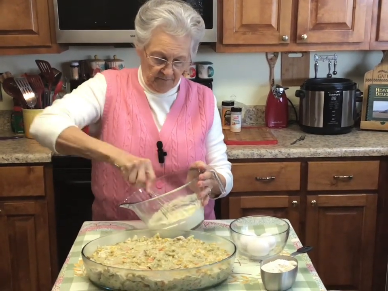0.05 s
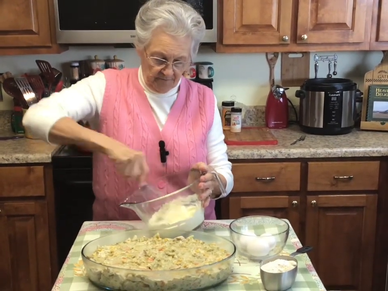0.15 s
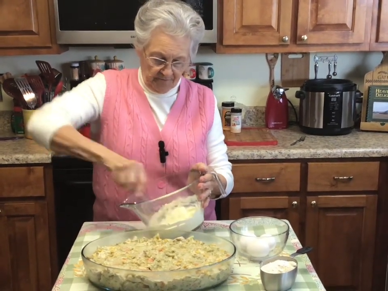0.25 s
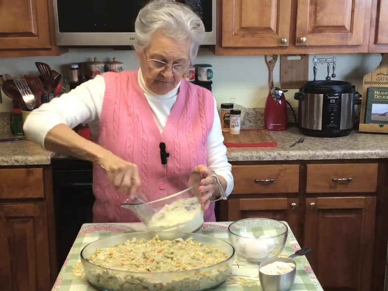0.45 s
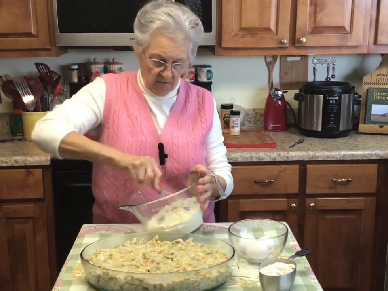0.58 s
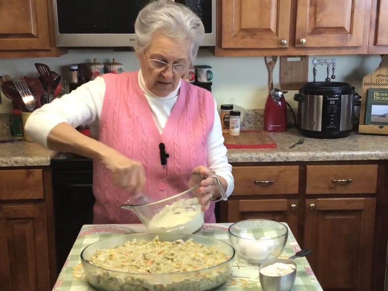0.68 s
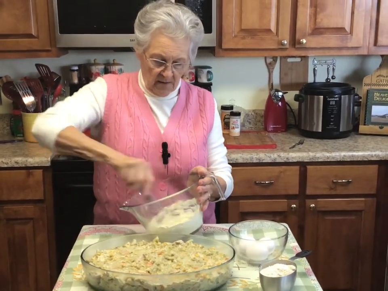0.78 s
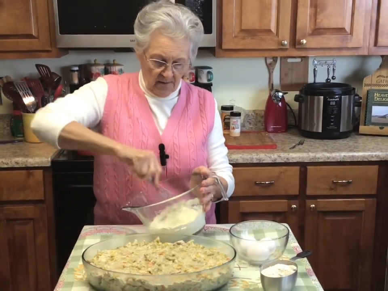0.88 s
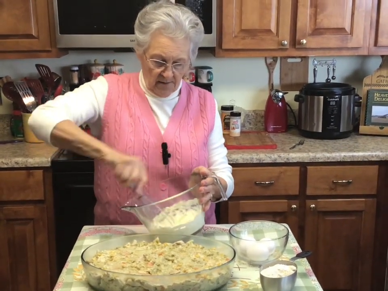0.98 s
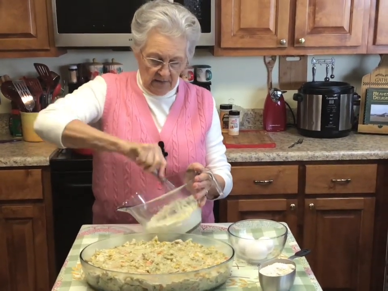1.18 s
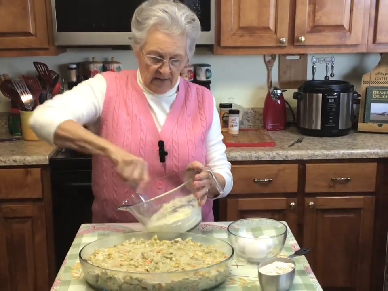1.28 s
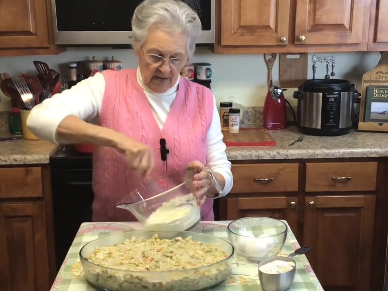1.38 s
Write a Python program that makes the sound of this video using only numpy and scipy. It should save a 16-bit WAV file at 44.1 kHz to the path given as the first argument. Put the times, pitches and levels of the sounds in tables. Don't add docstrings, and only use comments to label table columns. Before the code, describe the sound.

A wire whisk clatters against a glass bowl in quick, uneven strokes through soft cheese

```python
import sys
import numpy as np
from scipy import signal
from scipy.fft import rfft, irfft
from scipy.io import wavfile
from scipy.ndimage import uniform_filter1d

SR = 44100
rng = np.random.default_rng(int(sys.argv[2]) if len(sys.argv) > 2 else 0)


def undo_db(level):
    steps = np.asarray(level, float) / 20
    return 10 ** steps


def generate_wav(signal):
    frames = np.transpose(np.atleast_2d(signal))
    scaled = np.clip(frames, -1, 1) * 32767
    pcm = np.round(scaled).astype(np.int16)
    wavfile.write(sys.argv[1], SR, pcm)


N = 63945

# start_s, level_db, spread_ms, tilt_db_per_octave, loudest_hz
FIRM_BLOWS = [(0.0291, -36, 1.57, 2.5, 13700), (0.153, -30.5, 1.28, 2, 4272), (0.218, -16.5, 2.6, 3, 14210),
              (0.3129, -22.5, 2.86, 2, 5860), (0.433, -16, 3.6, 0.5, 3280), (0.4407, -15.5, 2.1, 4, 12430),
              (0.5623, -18.5, 3.76, 5, 3950), (0.6832, -20.5, 3.8, 2.5, 3640),
              (0.7107, -27, 3.9, -3, 15300), (.7215, -38, 0.83, 1, 1536), (0.73, -28.5, 0.67, 0, 4100),
              (0.8259, -22, 3.76, -1, 3964), (0.9847, -17, 1.26, 2.5, 9410), (1.0926, -7, 2.3, 2, 14200),
              (1.1673, -25, 1.46, 2, 3936), (1.212, -22, 1.34, -2.5, 5060), (1.225, -24, 1.45, 3.5, 5900),
              (1.29, -32, 3.6, 5, 8700), (1.298, -36, 2.55, -1, 5300), (1.327, -24, 2, 3, 4150),
              (1.3349, -28, 1.5, -13, 2920), (1.3511, -24, 0.5, -3.5, 4340),
              (1.395, -32.5, 0.12, -10.1, 4180), (1.41, -27.5, 1.23, -2, 3190)]
# start_s, level_db, spread_ms, loudest_hz
LIGHT_TOUCHES = [(.0003, -36.5, 1.5, 5370), (0.042, -40.5, 2.5, 6300), (0.077, -43, 1.3, 4870),
                 (.1025, -79, 0.51, 4240), (0.1162, -46.5, 0.82, 4600), (0.136, -59, 0.39, 4170),
                 (0.1448, -46, 0.67, 3150), (0.213, -42, 2.1, 7260), (0.377, -39.5, 2.3, 4240),
                 (0.4272, -31, 3.1, 6100), (0.467, -54, 4.9, 13000), (0.533, -35, 2.33, 3500),
                 (0.6253, -39, 2.96, 3140), (0.642, -44, 0.82, 4160), (0.784, -37, 3.5, 6540),
                 (0.8205, -28.5, 2.4, 4130), (.8892, -34.5, 1.57, 12400), (0.9324, -45, 0.71, 4860),
                 (0.976, -38, 2, 12600), (0.9805, -32.5, 2, 9600), (1.0878, -27.5, 2.78, 9350),
                 (1.309, -34, 1.1, 5400), (1.317, -31, 2.96, 2570), (1.3372, -43, 1.6, 13200),
                 (1.341, -33, 0.93, 3110), (1.388, -40, 1.46, 5200), (1.399, -45, 0.71, 2320),
                 (1.4448, -37, 0.52, 3720)]
# start_s, lowest_tone_db, second_tone_db, third_tone_db, fourth_tone_db
BOWL_RINGS = [(0.001, -67, -65, -47, -52), (0.027, -68, -98, -43, -53), (0.119, -96, -98, -77.5, -73),
              (0.153, -56, -90, -59, -69.5), (0.221, -30.5, -54, -41, -47.5),
              (0.317, -38, -58, -46.5, -80.5), (0.437, -43, -48.5, -58, -42.5),
              (0.567, -36.5, -51, -40.5, -44), (0.687, -44.5, -73, -50.5, -49),
              (0.827, -43.5, -55, -41.5, -62), (0.986, -47.5, -79, -76, -44.5),
              (1.093, -31.5, -28.5, -19, -23.5), (1.169, -41, -49, -42.5, -44.5),
              (1.213, -37, -44.5, -27.5, -37), (1.293, -43, -61, -46.5, -45.5),
              (1.350, -52.5, -56, -57, -49.5), (1.394, -54, -70, -49.5, -65)]
# start_s, level_db, pitch_hz, fade_s (time to drop 60 dB)
DULL_KNOCKS = [(0.434, -29.5, 556.5, 0.02414), (0.565, -35.5, 700, 0.048), (0.686, -29.5, 918, 0.022),
               (0.698, -35, 760, 0.028), (0.721, -29.5, 1470, 0.019), (0.611, -36.5, 1467, 0.018),
               (0.951, -39.5, 1360, 0.019), (1.169, -34, 536, 0.038), (1.168, -40.5, 139, 0.055),
               (1.201, -47.5, 25.6, 0.243), (1.213, -55, 122.9, 0.064), (1.332, -44, 2190, 0.02),
               (1.41, -57.5, 76, 0.16)]
# pitch_hz, fade_s, build_up_s
BOWL_TONES = [(619, .24, .007), (1012, .28, .003), (1411, .2, .004), (1535, .12, .002)]
# pitch_hz, level_db, fade_s
HIGH_TONES = [(2288, -10, .05), (2476, -10, .07), (3720, -7, .06), (3810, -7, .05), (4420, -4, .07),
              (5081, -2, .06), (5293, -7, .06), (5518, -6, .06), (5842, -6, .07), (7000, -6, .035),
              (9400, -9, .03), (11300, -11, .03), (13600, -7, .03), (14680, -9, .03)]
# pitch_hz, level_db (per Hz)
CRACK_COLOUR = [(120, -44), (200, -2.5), (1290, 5), (3250, 5), (5160, 3.5), (7060, 4), (7740, -2.5),
                (14000, 6.5), (16500, -13)]
# pitch_hz, fade_s
ECHO_FADE = [(300, 0.45), (790, 0.36), (2090, 0.14), (5510, 0.17), (14600, 0.14)]
# pitch_hz, level_db (per Hz)
HISS_COLOUR = [(25, -15), (300, -11.5), (600, -11), (1500, -20), (2300, -17.5), (5500, -19), (8000, -22.5),
               (16500, -34)]
# time_s, level_db
CLOTH_LEVEL = [(0, -75.5), (.15, -88), (.3, -78), (0.449, -55), (.6, -80), (.8, -79), (1.05, -81),
               (1.17, -73), (1.23, -58), (1.32, -89), (1.45, -78)]
# start_s, level_db, pitch_hz, fade_s
WIRE_TICKS = [(.0303, -38, 2400, 0.0044), (.0303, -43.5, 9300, 0.0078), (.0445, -45, 3400, 0.01),
              (.1026, -52, 4240, 0.0082), (0.119, -60, 1480, 0.04), (.138, -45, 4200, 0.0072),
              (0.1562, -45, 4300, 0.037), (0.1547, -51.5, 6900, 0.13), (0.2146, -49, 6930, 0.01),
              (.2205, -32.5, 3500, 0.021), (.2205, -37, 4800, 0.027), (.2205, -36.5, 6450, 0.025),
              (.222, -44, 2480, 0.094), (.222, -35.5, 5060, 0.028), (0.224, -37.5, 5830, 0.028),
              (.3148, -47, 3731, 0.089), (.348, -44, 900, 0.013), (.4428, -39, 12300, .008),
              (.443, -28, 3790, 0.0072), (0.567, -37.5, 4414, 0.0385), (0.566, -32.5, 6100, 0.015),
              (.627, -46.5, 2500, .006), (.641, -47, 4200, 0.017), (0.687, -30.5, 3900, 0.013),
              (0.7294, -37, 4240, .012), (.7795, -44, 6500, 0.014), (0.7842, -50.5, 4200, .012),
              (.8278, -32, 3300, 0.021), (0.8258, -37, 4425, 0.062), (.9335, -49, 5200, 0.0092),
              (0.973, -41, 1400, 0.02), (0.988, -34.5, 5400, .035), (1.0957, -15, 4400, .004),
              (1.0952, -24, 7000, .02), (1.097, -26, 5076, .05), (1.1698, -32, 4100, 0.0069),
              (1.1691, -36.5, 6700, 0.013), (1.2134, -29, 1400, 0.06), (1.2114, -54, 5200, .02),
              (1.228, -49, 5840, 0.059), (1.2915, -39.5, 3030, .012), (1.298, -44, 5380, 0.0363),
              (1.329, -50, 4285, 0.011), (1.3333, -35, 2400, .003), (1.3427, -35, 3000, .003),
              (1.4012, -39, 1500, .005), (1.4117, -31, 3500, .0025), (1.351, -45, 2200, 0.004),
              (1.353, -47, 4400, 0.037), (1.395, -34, 4285, .012)]

HISS_DB = -70
CLOTH_HZ, CLOTH_SWELL_DB = 60, 2.5
KNOCK_ECHO_DB, TICK_ECHO_DB, WALL_S = -11.5, -9.5, 0.0059
CRACK_FADE_S, WIRE_SPREAD_DB, CLATTER_DB, CLATTER_LOW_HZ = 0.026, 0.5, -11, 486
BAND_DB, BAND_HZ = 3, 110
HUMP_DB = 3
HIGH_TONES_DB, SPOT_DB = -25, 3.5
PING_DB, PING_FADE_S = -18.5, 0.022
BLOW_FOCUS_DB, TOUCH_FOCUS_DB, FOCUS_OCTAVES = 4, 6, 0.17
BLOW_WASH_DB, TOUCH_WASH_DB = -3, -0.5
TOUCH_TILT_DB = -1
DAMP_S, STOP_S = 0.075, 0.006
WAVER_HZ, WAVER_TURN = 22, 0.4
FLUTTER_DB = 4
TICK_RISE_TURNS, KNOCK_RISE_TURNS = 0.63, 0.53
GATE_DB, GATE_SLOPE, GATE_S = -45.5, 0.36, 0.025
EDGE_HZ = 16350


def read(points, hz):
    f, value = np.transpose(points)
    return np.interp(np.log(hz + 1), np.log(f + 1), value)


def add(mix, start_s, sound):
    part = mix[max(round(start_s * SR), 0):][:len(sound)]
    part += sound[:len(part)]


def colour(x, db):
    return irfft(rfft(x) * undo_db(db(np.fft.rfftfreq(len(x), 1 / SR))), len(x))


def smooth_noise(count, size):
    x = uniform_filter1d(uniform_filter1d(rng.standard_normal(count), size=size), size=size)
    return x / x.std()


def hiss():
    x = colour(rng.standard_normal(N), lambda f: read(HISS_COLOUR, f))
    return undo_db(HISS_DB) * x / x.std()


def cloth():
    x = colour(rng.standard_normal(N), lambda f: -20 * np.log10(1 + (f / CLOTH_HZ) ** 2))
    level_db = np.interp(np.arange(N) / SR, *np.transpose(CLOTH_LEVEL))
    return undo_db(level_db + CLOTH_SWELL_DB * smooth_noise(N, 1500)) * x / x.std()


def echoes(size):
    hz, t, z = signal.stft(rng.standard_normal(size), SR, nperseg=128)
    fading = z * undo_db(-60 * t / read(ECHO_FADE, hz)[:, None])
    tail = signal.istft(fading, SR, nperseg=128)[1][:size]
    tail = tail * (1 - np.exp(-(np.arange(size) / SR / WALL_S) ** 2))
    return tail / np.linalg.norm(tail)


def kitchen(x):
    return signal.fftconvolve(x, echoes(SR // 2))[:N]


def cracks(t, spread_ms, count=24):
    late = 3 * (np.arange(count) + rng.random(count)) / count
    strength = np.minimum(late / 1.83, 1) * np.exp(-1.1 * late)
    strength = strength * undo_db(WIRE_SPREAD_DB * rng.standard_normal(count))
    landings = np.bincount((spread_ms * SR / 1000 * late).astype(int), strength)
    power = signal.fftconvolve(landings ** 2, undo_db(-120 * t / CRACK_FADE_S))[:len(t)]
    noise = np.sqrt(abs(power)) * rng.standard_normal(len(t))
    return noise / np.linalg.norm(noise)


def high_ring(t, spread_ms, focus_hz):
    hz, db, fade_s = np.transpose(HIGH_TONES)[:, :, None]
    spot = rng.standard_normal((len(HIGH_TONES), 1))
    phase = rng.random((len(HIGH_TONES), 1))
    tones = undo_db(db + SPOT_DB * spot - 60 * t / fade_s) * np.sin(2 * np.pi * (hz * t + phase))
    ping = undo_db(PING_DB - HIGH_TONES_DB - 60 * t / PING_FADE_S) * np.sin(2 * np.pi * focus_hz * t)
    return (tones.sum(0) + ping) * (1 - np.exp(-t * 1000 / spread_ms))


def clatter(level_db, spread_ms, tilt_db, focus_hz, focus_db, wash_db):
    t = np.arange(8192) / SR
    humps = rng.standard_normal(12)

    def crack_db(f):
        near = sum(np.exp(-((f - hz) / (BAND_HZ * (1 + hz / 6000))) ** 2) for hz, *_ in HIGH_TONES)
        hump = np.interp(f, np.linspace(0, 16000, len(humps)), humps)
        return read(CRACK_COLOUR, f) + HUMP_DB * hump + BAND_DB * np.minimum(near, 1)

    def landing_db(f):
        octaves_off = np.log2((f + 1) / focus_hz)
        focus = focus_db * np.exp(-(octaves_off / FOCUS_OCTAVES) ** 2)
        return tilt_db * np.log2((f + 1500) / 6000) + focus

    wash = undo_db(wash_db) * min(spread_ms / 1.95, 1) * echoes(len(t))
    noise = colour(cracks(t, spread_ms) + wash, crack_db)
    ring = undo_db(HIGH_TONES_DB) * min(spread_ms / 2, 1) * high_ring(t, spread_ms, focus_hz)
    out = colour(noise + ring, landing_db)
    out = signal.sosfilt(signal.butter(3, CLATTER_LOW_HZ, "high", fs=SR, output="sos"), out)
    return undo_db(level_db + CLATTER_DB) * out * np.sqrt(0.003 * SR / (out ** 2).sum())


def wires():
    out = np.zeros(N)
    for start_s, *blow in FIRM_BLOWS:
        add(out, start_s, clatter(*blow, BLOW_FOCUS_DB, BLOW_WASH_DB))
    for start_s, db, spread_ms, hz in LIGHT_TOUCHES:
        add(out, start_s, clatter(db, spread_ms, TOUCH_TILT_DB, hz, TOUCH_FOCUS_DB, TOUCH_WASH_DB))
    return out


def bowl():
    out, t = np.zeros(N), np.arange(SR // 4) / SR
    stops = [row[0] for row in BOWL_RINGS[1:]] + [N / SR]
    for (start_s, *levels), stop_s in zip(BOWL_RINGS, stops):
        damping = np.exp(-(t / DAMP_S) ** 2 - np.maximum(t + start_s - stop_s, 0) / STOP_S)
        for (hz, fade_s, rise_s), db in zip(BOWL_TONES, levels):
            phase, beat = rng.random(2)
            waver = WAVER_TURN * np.sin(2 * np.pi * (WAVER_HZ * t + beat))
            tone = np.sin(2 * np.pi * (hz * t + phase) + waver)
            swell = (1 - np.exp(-t / rise_s)) ** 2
            add(out, start_s, undo_db(db - 60 * t / fade_s) * damping * swell * tone)
    return out


def ticks():
    out, t = np.zeros(N), np.arange(SR // 8) / SR
    for start_s, db, hz, fade_s in WIRE_TICKS:
        flutter_db = FLUTTER_DB * np.minimum(t / 0.004, 1) * smooth_noise(len(t), 120)
        rise = 1 - np.exp(-t * hz / TICK_RISE_TURNS)
        add(out, start_s, undo_db(db + flutter_db - 60 * t / fade_s) * rise * np.sin(2 * np.pi * hz * t))
    return out + undo_db(TICK_ECHO_DB) * kitchen(out)


def knocks():
    out, t = np.zeros(N), np.arange(SR // 3) / SR
    for start_s, db, hz, fade_s in DULL_KNOCKS:
        waver = 1 + 0.8 * uniform_filter1d(rng.standard_normal(len(t)), size=200)
        tone = np.sin(2 * np.pi * hz * np.cumsum(waver) / SR)
        rise = 1 - np.exp(-t * hz / KNOCK_RISE_TURNS)
        add(out, start_s, undo_db(db - 60 * t / fade_s) * rise * tone)
    return out + undo_db(KNOCK_ECHO_DB) * kitchen(out)


def scene():
    return (hiss() + cloth() + wires() + bowl() + ticks() + knocks())[None]


def low_pass(x):
    return signal.sosfilt(signal.butter(12, 16810, fs=SR, output="sos"), x)


def record(dry):
    power = abs(uniform_filter1d(dry ** 2, round(GATE_S * SR)))
    level_db = 10 * np.log10(power + 1e-12)
    gated = dry * undo_db(GATE_SLOPE * np.minimum(level_db - GATE_DB, 0))
    edge = signal.firwin(255, EDGE_HZ, window=("kaiser", 7), fs=SR)
    mix = signal.oaconvolve(gated, edge[None], "same")
    return low_pass(mix)


dry = scene()
out = record(dry)
generate_wav(out)
```